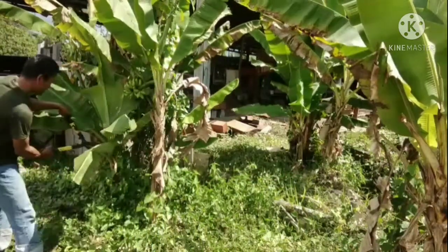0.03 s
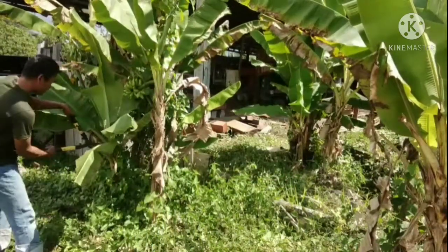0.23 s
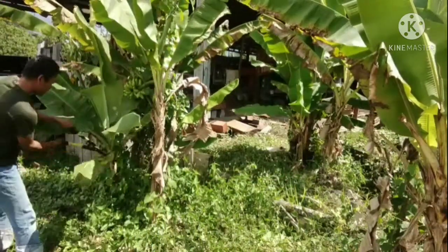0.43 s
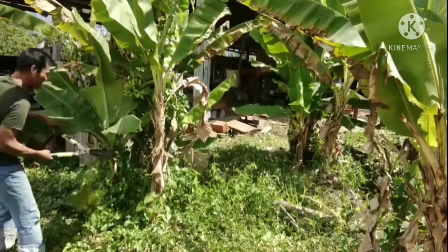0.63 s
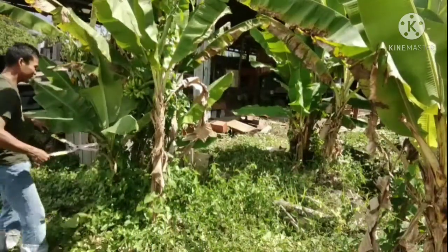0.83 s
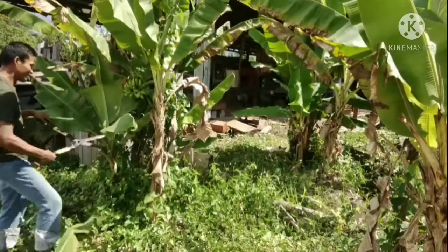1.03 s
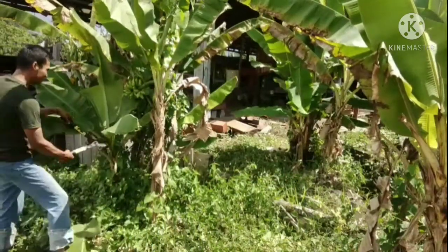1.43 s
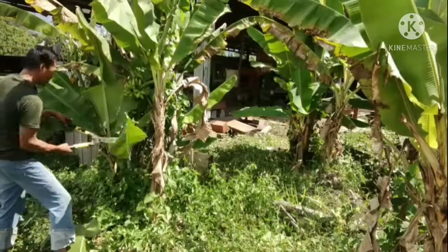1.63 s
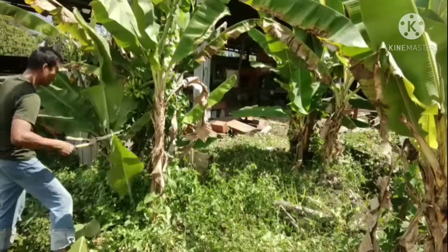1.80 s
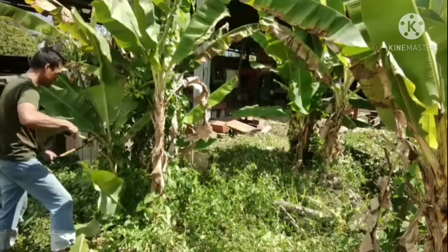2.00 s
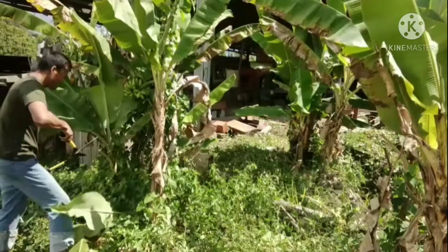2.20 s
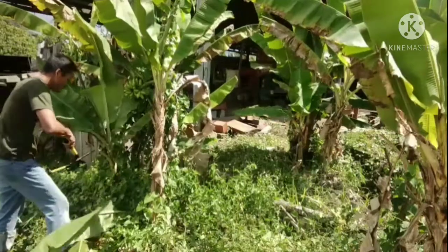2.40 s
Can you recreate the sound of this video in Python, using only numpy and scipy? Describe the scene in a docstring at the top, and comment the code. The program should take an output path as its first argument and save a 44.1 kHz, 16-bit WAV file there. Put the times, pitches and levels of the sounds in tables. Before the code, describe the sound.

Long-handled shears cut two banana leaves with sharp crunching snips, then a leaf thuds down.

```python
"""Cutting banana leaves in a grove

Long-handled shears, close by, cut two leaves: each stalk crunches, then the steel blades clack shut.
The first leaf drops in the grass and feet shift through the weeds; the second lands with a hollow thud.
Light wind rumbles on a small microphone whose port rings in the treble."""
import sys
import numpy as np
from scipy import signal
from scipy.fft import rfft, irfft, next_fast_len
from scipy.io import wavfile
from scipy.ndimage import map_coordinates

SR = 44100
rng = np.random.default_rng(int(sys.argv[2]) if len(sys.argv) > 2 else 0)


def generate_wav(signal):
    """Clip the signal to [-1, 1] and save it as 16-bit WAV at the path in sys.argv[1]."""
    frames = np.transpose(np.atleast_2d(signal))
    scaled = np.clip(frames, -1, 1) * 32767
    pcm = np.round(scaled).astype(np.int16)
    wavfile.write(sys.argv[1], SR, pcm)


N = 112454
TIME = np.arange(N) / SR
AGE = TIME[:SR // 4]  # seconds since a short event began
SNAP_RISE_S = 0.00027


# blade meeting blade: start_s, level_db, tilt_db_per_octave, t60_s
BLADE_CONTACTS = [(0.2575, -14, -0.8, 0.0078), (0.2596, -22, 2.5, 0.021), (.2663, -26, 0.5, 0.012),
                  (.2738, -31, -1, 0.0079), (.2824, -28, 2.5, 0.01), (1.3840, -23.5, -2, 0.014),
                  (1.3885, -24.5, 2.8, 0.016), (1.3924, -26, 4.5, 0.012)]
# spectrum of a contact: frequency_hz, gain_db
CRACK_SPECTRUM = [(100, -14), (700, -15.5), (1500, -0.5), (2200, 3), (3000, -3), (4100, 0), (4800, -3.5),
                  (6000, -2.5), (7000, -2), (8600, 0.5), (11000, -5.5), (15000, -8.5)]
# modes of the steel: pitch_hz, level_db, t60_s
BLADE_MODES = [(935, -8, 0.071), (1515, 4, 0.068), (2150, -7, .06), (6180, -1, 0.075), (6700, -9, 0.054),
               (7365, -34, 0.055), (8470, -5, .05), (9050, 0, 0.071), (11200, -8, .06), (14500, 1, .06)]

def blades(ring_db=-30):
    """The blades break through and chatter: each contact is a crack and a short, damped steel ring."""
    out = np.zeros(N)
    for start_s, level_db, tilt_db, t60_s in BLADE_CONTACTS:
        ring = sum(amp(mode_db - 60 * AGE / mode_t60_s) * np.sin(2 * np.pi * (hz * AGE + rng.random()))
                   for hz, mode_db, mode_t60_s in BLADE_MODES)
        crack = colour(burst(SNAP_RISE_S, t60_s), CRACK_SPECTRUM, tilt_db)
        add(out, start_s, amp(level_db) * (crack + amp(ring_db) * ring))
    return out


# blades squeezing a stalk, one list per cut: time_s, level_db
SQUEEZES = [
    [(.19, -62), (.212, -56.5), (.222, -49), (.238, -47.5), (.247, -39.5), (.255, -42), (.268, -42),
     (.285, -64)],
    [(1.333, -51), (1.341, -47.5), (1.348, -40.5), (1.362, -43.5), (1.372, -35), (1.379, -44), (1.39, -52),
     (1.41, -66)],
]
# the stalk giving way: start_s, level_db
CRUNCHES = [(.2450, -38), (1.3466, -38.5), (1.3706, -24.5)]
# spectra of breaking fibres and of one crunch: frequency_hz, gain_db
FIBRE_SPECTRUM = [(60, -29), (220, -4), (380, 1.5), (560, 0.5), (720, 2), (950, 5), (1400, 1.5),
                  (2200, -1.5), (3000, -7), (4200, -4.5), (5200, -8), (9000, -11), (15000, -16)]
CRUNCH_SPECTRUM = [(100, -11), (350, 1), (900, 3), (1500, 1), (2800, -2.5), (4200, 4), (5000, -2),
                   (9000, -10.5), (15000, -13)]

def stalks():
    """Juicy fibres break ever harder as the blades squeeze, with a few larger crunches."""
    effort = sum(amp(curve(cut)) * (TIME > cut[0][0]) * (TIME < cut[-1][0]) for cut in SQUEEZES)
    out = effort * crackle(FIBRE_SPECTRUM, per_s=7000, spread_db=3)
    for start_s, level_db in CRUNCHES:
        add(out, start_s, amp(level_db) * colour(burst(SNAP_RISE_S, t60_s=0.018), CRUNCH_SPECTRUM))
    return out


# blade sliding over blade: start_s, length_s, level_db
SCRAPES = [(.212, 0.0405, -51.5), (1.337, 0.049, -56)]
# hiss of the edges: frequency_hz, gain_db
EDGE_SPECTRUM = [(500, -26), (2000, 8), (4600, -16), (5800, 0), (6800, 4.5), (8000, -5), (10000, -9),
                 (15000, -5)]

def scrape(fade_s=0.0028):
    """The edges hiss against each other while the shears close."""
    gate = np.zeros(N)
    for start_s, length_s, level_db in SCRAPES:
        inside_s = np.minimum(TIME - start_s, start_s + length_s - TIME)
        gate += amp(level_db) * np.clip(inside_s / fade_s, 0, 1)
    return gate * noise(EDGE_SPECTRUM)


# the heavy second leaf hitting the ground: start_s, level_db
LANDING_BLOWS = [(1.7636, -30.5), (1.7665, -27.5), (1.7815, -33.5)]
# spectrum of a blow: frequency_hz, gain_db
THUD_SPECTRUM = [(40, -7.5), (130, 6.5), (260, 2.5), (400, -3), (560, -7), (800, -7), (1050, -12.5),
                 (1600, -17.5), (2400, -24), (4500, -36), (7000, -28), (15000, -47)]

def falling_leaf(note_hz=816, note_t60_s=0.11, note_db=-13, flap_db=-13, push_db=21):
    """Each blow of the thick stalk is one low push, its own hollow note and a flap of the broad leaf."""
    out = np.zeros(N)
    note = amp(note_db - 60 * AGE / note_t60_s) * np.sin(2 * np.pi * note_hz * AGE)
    for start_s, level_db in LANDING_BLOWS:
        blow = amp(flap_db) * burst(rise_s=0.0008, t60_s=0.11)
        blow[0] += amp(push_db)
        add(out, start_s, amp(level_db) * (colour(blow, THUD_SPECTRUM) + note))
    return out


# weeds and leaves stirring around the cutter: time_s, level_db
RUSTLE_LEVELS = [(0, -64.5), (.15, -67.5), (.33, -58), (.42, -64), (.56, -69), (.62, -58.5), (.70, -67.5),
                 (.78, -57.5), (.86, -58.5), (.92, -54), (1.0, -56.5), (1.09, -51.5), (1.14, -60.5),
                 (1.3, -62.5), (1.5, -64), (1.6, -70), (1.7, -68), (1.78, -54), (1.85, -64.5), (2.03, -62),
                 (2.2, -68), (2.4, -70), (2.54, -68.5)]
# snapping stems and light taps of the shears: start_s, level_db, tilt_db_per_octave, t60_s
SNAPS = [(.1957, -43, 1, 0.0063), (0.3423, -44, 6.5, 0.039), (0.357, -51.5, 0, 0.086),
         (0.409, -55.5, 6, 0.051), (.5428, -51, 1, .012), (0.7344, -39.5, -5.5, 0.013),
         (0.7479, -41.5, -6, 0.018), (0.7552, -45, -3, 0.021), (.7788, -51, -3, 0.02),
         (0.92, -47.5, -2, 0.026), (1.0218, -42.5, -6, 0.023), (1.1604, -50, 2, 0.037),
         (1.1958, -47, -1, .008), (1.2642, -44.5, 0.5, 0.0072), (1.3109, -47.5, 0, 0.031),
         (1.457, -45, 6, .015), (1.4872, -43, 1.5, 0.021), (1.5034, -46.5, -1, 0.047),
         (1.514, -51, 1, 0.079), (1.638, -47.5, -5, 0.018), (1.656, -56.5, 0.5, 0.043),
         (1.873, -54.5, -4.5, 0.077), (2.441, -56, -3, .08)]
# leaves and feet brushing into the grass: start_s, level_db, t60_s
BRUSHES = [(.582, -40, 0.082), (.831, -40, 0.047), (2.03, -58.5, 0.14), (2.225, -57.5, 0.09),
           (2.48, -55, 0.12)]
# spectra of the rustle, ticks, snaps and brushes: frequency_hz, gain_db
WEED_SPECTRUM = [(100, -6.5), (400, -4), (1200, 3.5), (2300, 1), (4500, -6), (9000, -12), (15000, -16)]
TICK_SPECTRUM = [(500, -18), (2000, -3), (7000, -4), (15000, -2.5)]
STEM_SPECTRUM = [(100, -19), (700, -4), (2000, 7.5), (4500, 2), (9000, 0), (15000, -8.5)]
GRASS_SPECTRUM = [(60, -24), (200, 0.5), (1000, 4), (2200, -2), (5000, -11.5), (15000, -20)]

def undergrowth(flutter_db=2, tick_db=-78):
    """Weeds rustle in clumps, with stray ticks of dry leaves, single snaps and soft brushes on top."""
    rustle_db = curve(RUSTLE_LEVELS) + flutter_db * wobble(per_s=65)
    out = amp(rustle_db) * crackle(WEED_SPECTRUM, per_s=4000, spread_db=2.5)
    out += amp(tick_db) * crackle(TICK_SPECTRUM, per_s=120, spread_db=2.5)
    for start_s, level_db, tilt_db, t60_s in SNAPS:
        add(out, start_s, amp(level_db) * colour(burst(SNAP_RISE_S, t60_s), STEM_SPECTRUM, tilt_db))
    for start_s, level_db, t60_s in BRUSHES:
        add(out, start_s, amp(level_db) * colour(burst(rise_s=0.003, t60_s=t60_s), GRASS_SPECTRUM))
    return out


# wind right on the microphone: time_s, level_db
WIND_LEVELS = [(0, -53), (.08, -53.5), (.145, -52), (.18, -40.5), (.26, -41.5), (.35, -49.5), (.55, -54),
               (.62, -46), (.84, -49), (.92, -54), (1.02, -53.5), (1.18, -66), (1.32, -46.5), (1.42, -52.5),
               (1.62, -57), (1.88, -53), (1.98, -47), (2.16, -39.5), (2.32, -51), (2.54, -46.5)]
# single puffs: centre_s, peak_db
PUFFS = [(0.188, -34.5), (.438, -32.5), (.668, -38), (.842, -35.5), (1.013, -43.5), (1.323, -34),
         (1.727, -45), (2.276, -35.5), (2.369, -37)]
# spectra of the rumble and of the buffeting in gusts: frequency_hz, gain_db
RUMBLE_SPECTRUM = [(8, -6), (20, 2), (35, 2.5), (70, -6), (120, -16.5), (180, -26.5), (300, -42),
                   (800, -65), (3000, -120)]
BUFFET_SPECTRUM = [(30, -21.5), (70, -4.5), (125, -3.5), (190, -12), (300, -30.5), (800, -58), (3000, -120)]

def wind(gust_db=-40.5, puff_half_width_s=0.0071):
    """Wind on the microphone: a low rumble that brightens in gusts, and a few single puffs."""
    level_db = curve(WIND_LEVELS)
    buffet_db = -47 + 1.88 * (level_db - gust_db)  # grows faster than the rumble
    out = amp(level_db) * noise(RUMBLE_SPECTRUM) + amp(buffet_db) * noise(BUFFET_SPECTRUM)
    for centre_s, peak_db in PUFFS:
        offset = (TIME - centre_s) / puff_half_width_s
        out += amp(peak_db) * (1 - offset ** 2) * np.exp(-offset ** 2)
    return out


# decay among the plants: frequency_hz, t60_s
GROVE_DECAY = [(150, 0.14), (1000, 0.16), (7000, 0.11), (15000, 0.13)]

def grove(sound):
    """Short diffuse scatter from the surrounding trunks and leaves."""
    hz, age_s, spectra = signal.stft(rng.standard_normal(SR // 2), SR, nperseg=256)
    decay = amp(-60 * age_s / along(GROVE_DECAY, hz)[:, None])
    tail = signal.istft(spectra * decay, SR, nperseg=256)[1]
    return signal.fftconvolve(sound, tail / np.linalg.norm(tail))[:N]


# spectra of the grove's quiet air and of a thin high hiss: frequency_hz, gain_db
AIR_SPECTRUM = [(60, 15.5), (200, 5), (500, 7), (1500, 0.5), (4500, -12), (9000, -14), (15000, -14)]
HISS_SPECTRUM = [(5500, -25.5), (6500, -12), (6950, 1.5), (7400, -13), (8500, -24.5)]

def air(air_db=-64.5, hiss_db=-80, waver_db=3):
    """A steady hush behind everything, with a faint wavering hiss."""
    hush = amp(air_db) * noise(AIR_SPECTRUM)
    hiss = amp(hiss_db + waver_db * wobble(per_s=14)) * noise(HISS_SPECTRUM)
    return hush + hiss


def amp(db):
    """Decibels to gain."""
    return 10 ** (np.asarray(db) / 20)


def unit(x):
    """Scale to rms 1."""
    return x / np.sqrt(np.mean(x ** 2) + 1e-20)


def along(points, hz):
    """Interpolate (frequency_hz, value) points on a log frequency axis."""
    point_hz, values = np.transpose(points)
    return np.interp(np.log(hz + 1), np.log(point_hz), values)


def curve(rows):
    """A level in dB for every sample."""
    time_s, level_db = np.transpose(rows)
    return np.interp(TIME, time_s, level_db)


def colour(x, spectrum, tilt_db=0, keep_power=True):
    """Causal filter with the given spectrum, tilted per octave above 500 Hz."""
    size = 2 * next_fast_len(len(x) // 2 + 4096)
    hz = np.fft.rfftfreq(size, 1 / SR)
    gain = amp(along(spectrum, hz) + tilt_db * np.log2(np.maximum(hz, 500) / 500))
    cepstrum = irfft(np.log(np.maximum(unit(gain) if keep_power else gain, 1e-6)))
    cepstrum[1:size // 2] *= 2  # fold onto positive time for minimum phase
    cepstrum[size // 2 + 1:] = 0
    return irfft(rfft(x, size) * np.exp(rfft(cepstrum)))[:len(x)]


def add(track, start_s, sound):
    """Mix a sound into a track at a time."""
    part = track[max(round(start_s * SR), 0):][:len(sound)]
    part += sound[:len(part)]


def noise(spectrum):
    """Coloured noise of rms 1."""
    return unit(colour(rng.standard_normal(N), spectrum))


def burst(rise_s, t60_s):
    """White noise that rises and dies away."""
    return rng.standard_normal(len(AGE)) * (1 - np.exp(-AGE / rise_s)) * amp(-60 * AGE / t60_s)


def crackle(spectrum, per_s, spread_db):
    """A shower of tiny breaks of uneven size, rms 1."""
    sizes = amp(spread_db * np.minimum(rng.exponential(size=N), 4))
    signs = rng.choice([-1, 1], N)
    breaks = rng.random(N) < per_s / SR
    return unit(colour(sizes * signs * breaks, spectrum))


def wobble(per_s):
    """A smooth random curve."""
    return map_coordinates(rng.standard_normal(int(N * per_s / SR) + 4), [TIME * per_s])


def scene(grove_db=-10):
    """Cutting and foliage in the grove, over quiet air and wind, in mono."""
    work = scrape() + stalks() + blades() + undergrowth() + falling_leaf()
    return (work + amp(grove_db) * grove(work) + air() + wind())[None]


# response of the small microphone and its port: frequency_hz, gain_db
MIC_RESPONSE = [(1000, -0.5), (4800, -0.5), (5900, 3), (6500, 9), (7000, 10.5), (7400, 10.5), (7900, 5),
                (8800, 2.5), (9800, 1), (12500, 2.5), (14000, 4), (15100, 16.5), (15400, 3.5), (15800, -12)]

def record(dry):
    """The microphone's treble resonances, then the band limit."""
    size = next_fast_len(N + SR // 4)
    heard = rfft(colour(dry[0], MIC_RESPONSE, keep_power=False), size)
    in_band = np.fft.rfftfreq(size, 1 / SR) < 15700
    return irfft(heard * in_band, size)[None, :N]


dry = scene()
out = record(dry)
generate_wav(out)
```